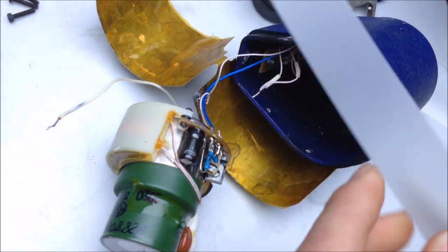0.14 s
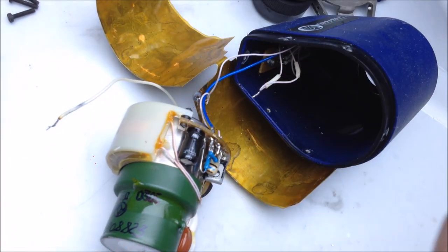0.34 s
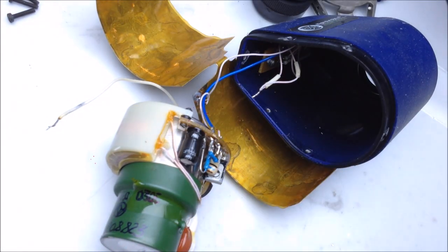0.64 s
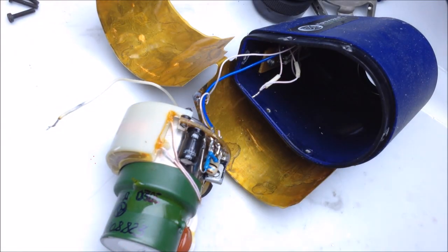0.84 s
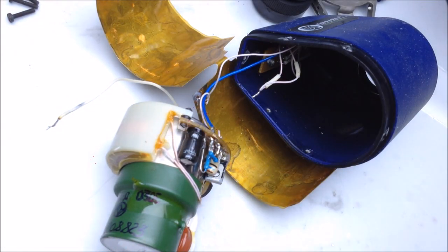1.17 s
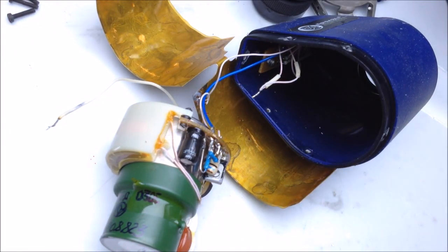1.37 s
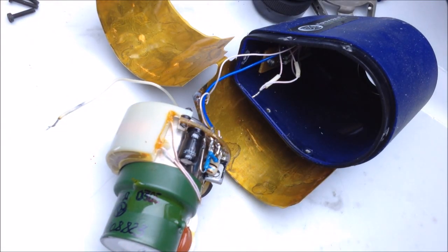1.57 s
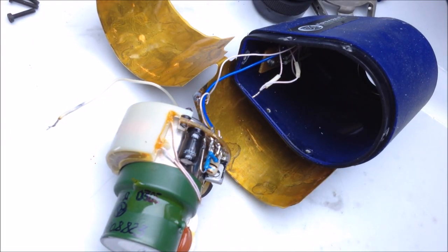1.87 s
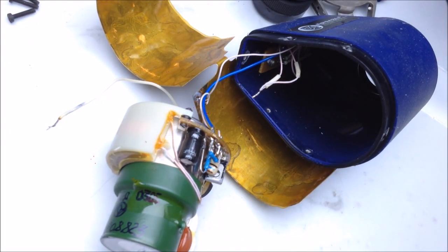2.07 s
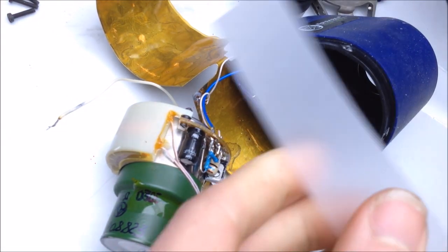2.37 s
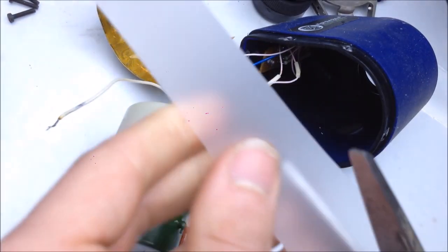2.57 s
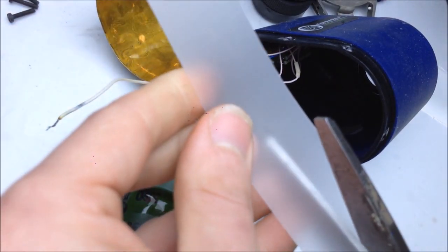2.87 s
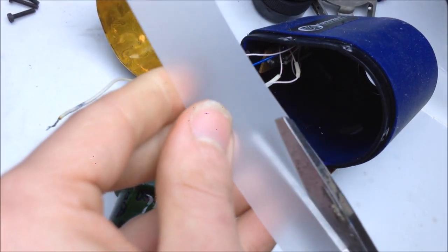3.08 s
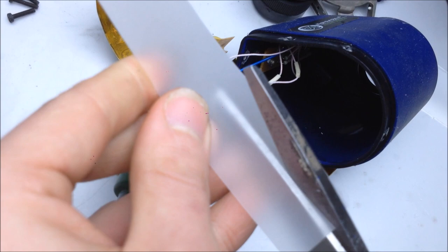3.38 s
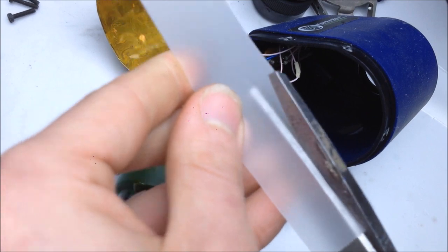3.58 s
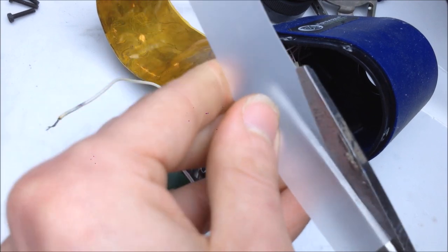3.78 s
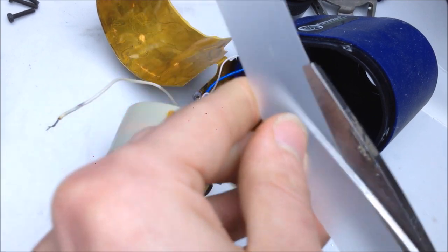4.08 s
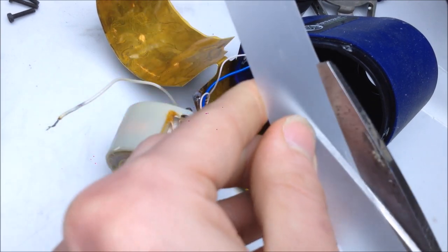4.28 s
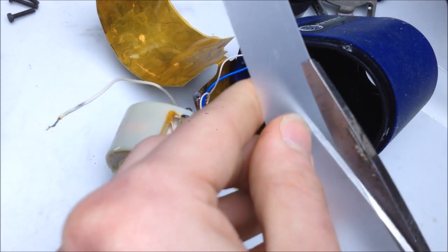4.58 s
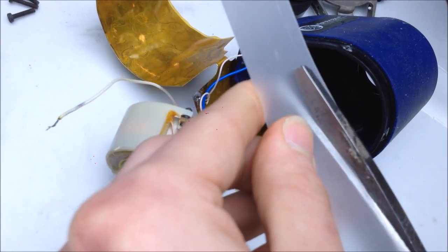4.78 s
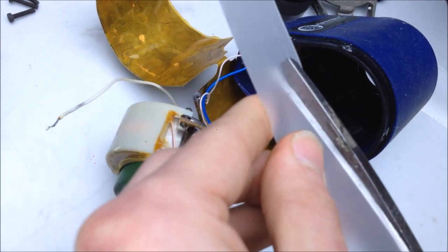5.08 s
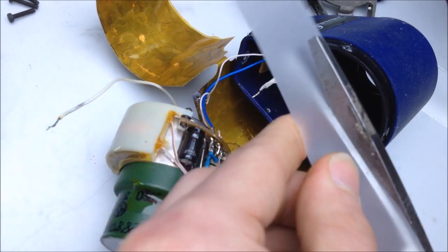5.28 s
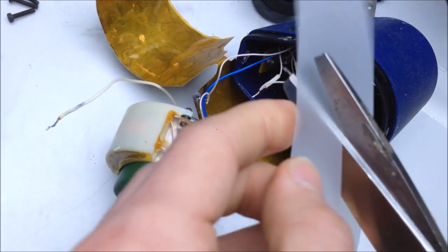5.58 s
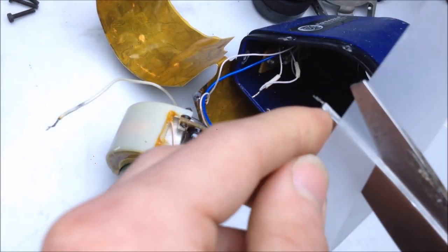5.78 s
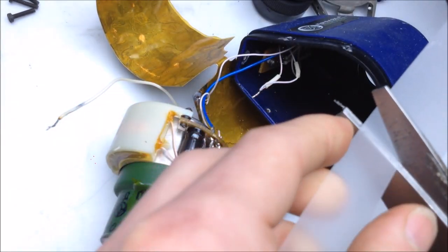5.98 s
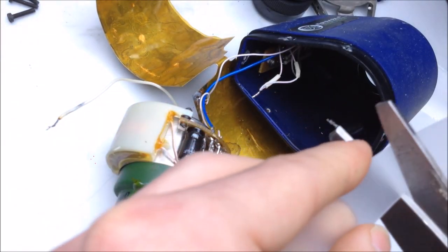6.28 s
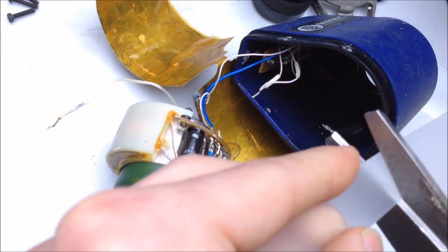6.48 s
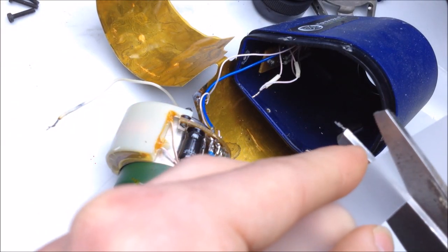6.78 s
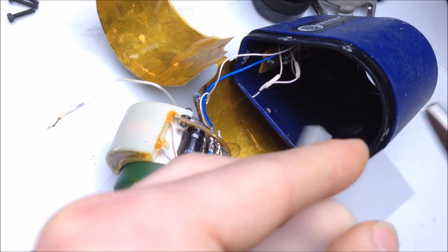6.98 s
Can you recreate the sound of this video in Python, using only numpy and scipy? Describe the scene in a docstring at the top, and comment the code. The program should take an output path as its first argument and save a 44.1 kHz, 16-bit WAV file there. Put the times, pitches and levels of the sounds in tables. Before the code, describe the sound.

Close scissors cut a plastic strip in crisp strokes and sticky, squeaky slips, ending with sharp snips above a soft steady hum.

```python
"""Scissors through thin plastic

Close up, over a workbench in a small room, scissors cut a strip off a plastic sheet. Each closing stroke
crunches through it; then the open blades are pushed up the slit in sticky, squeaky slips. The strip snaps
free and a last piece is snipped off. Fingers shift the sheet; a fan and a faint whine sit underneath."""
import sys
import numpy as np
from scipy import signal
from scipy.fft import rfft, irfft, next_fast_len
from scipy.io import wavfile
from scipy.ndimage import map_coordinates

SR = 44100
rng = np.random.default_rng(int(sys.argv[2]) if len(sys.argv) > 2 else 0)


def persist_wave(psi):
    """Save psi, clipped to +-1, as 16-bit WAV."""
    counts = np.round(np.clip(psi, -1, 1) * 32767).astype(np.int16)
    wavfile.write(sys.argv[1], SR, np.atleast_2d(counts).T)


N = 315030
STROKE_ATTACK_S = 0.0035

# Cue levels are relative: each layer adds its own trim.
# closing strokes: t/s, length/s, sheet body/dB, cutting edge/dB, growth over the stroke/dB, jolt/dB
STROKES = [(3.306, 0.064, -33.5, -30, -5, -34), (3.736, 0.036, -31.5, -31, -5.5, -45),
           (4.126, 0.093, -42.5, -35, -2, -58), (4.914, 0.056, -37.5, -36, 8, -60),
           (5.277, 0.068, -42, -36, 11, -53)]
# pushes up the slit: t/s, length/s, rub/dB, treble/dB, sheet f/Hz, squeak f/Hz, squeak window/s
PUSHES = [(2.884, 0.23, -51.5, 1.5, 860, 11800, 0.17), (3.445, 0.13, -50, -5.5, 770, 12500, 0.035),
          (3.899, 0.072, -49.5, 1.5, 880, 13000, 0.015), (4.623, 0.15, -44.5, 0.5, 994, 12300, 0.04),
          (5.021, 0.17, -49.5, -1, 750, 13200, 0.015)]
# the slit's edges slip along the blades: t/s, level/dB, length/s, bass/dB
SLIPS = [(2.8842, -42, 0.0038, -7), (2.9495, -56, 0.0017, 9), (2.9853, -35.5, .008, -3),
         (3.032, -32, 0.011, -1), (3.0655, -33, 0.0089, -0.5), (3.0983, -24, 0.0074, -3.5),
         (3.13, -30.5, 0.0067, -3.5), (3.4476, -47.5, 0.0019, -15), (3.477, -33.5, 0.0059, -4.5),
         (3.506, -25, 0.0052, -5), (3.535, -25, 0.011, -6.5), (3.5778, -28, 0.0046, -9.5),
         (3.905, -33, 0.0067, 3), (3.9277, -34, 0.0078, 0.5), (3.9474, -32, 0.0087, -4.5),
         (3.973, -37, 0.0043, -8), (3.9866, -35, 0.0091, -9), (4.6225, -50, 0.0052, 9),
         (4.6525, -36, .004, -9), (4.679, -30.5, 0.0077, -1.5), (4.7053, -36.5, 0.0092, 12),
         (4.722, -33, 0.0064, 0.5), (4.7447, -32.5, 0.0085, 1), (4.7669, -30.5, 0.0052, -4),
         (4.8385, -53.5, 0.0014, -10), (5.0313, -48.5, .001, -12), (5.0528, -28.5, 0.014, -3.5),
         (5.0796, -26, 0.0073, 7.5), (5.102, -32, 0.0074, 0), (5.1442, -27, 0.009, -5.5),
         (5.1744, -33.5, 0.0047, -13)]
# the blades break through or shut: t/s, level/dB, length/s, bass/dB, treble/dB, sheet f/Hz
SNAPS = [(4.3257, -17, 0.0033, -1, -1, 840), (4.3413, -31, 0.00074, 0.5, 3, 1320),
         (5.326, -25, 0.006, -8, 10.5, 710), (5.3795, -14.0, 0.0037, -1, -2.5, 1122)]
# resonances of sheet and blades: f/Hz, width/Hz, level/dB
BODY_MODES = [(735, 29, 5), (1086, 150, -10), (2153, 65, -29), (2400, 100, -11), (2720, 170, -5),
              (4260, 38, -9), (4490, 210, 2.5), (6390, 550, -5), (8790, 160, 4), (11800, 33, -15),
              (12330, 120, -16.5)]


def cutting(body_db=-3, edge_db=-3.5, ring_db=-6, crack_db=1, crack_bass_db=-11):
    """The closing blades crush the plastic finely; now and then a crack runs ahead."""
    cracks = [(3.3239, -28.5), (3.3436, -35), (3.3741, -31.5), (4.129, -25.5), (4.1591, -39), (4.1949, -29),
              (4.216, -32), (4.965, -40.5)]  # the loudest fractures: t/s, level/dB
    crunch_eq = [(47, -49), (80, -38.5), (227, -4), (386, -8.5), (1070, 3), (1560, -5), (2380, -3.5),
                 (3540, -11.5), (4420, -6), (5170, -12), (6310, -7.5), (11700, -19.5), (15000, -31),
                 (16000, -41)]  # colour of crushed plastic: f/Hz, level/dB
    crunch, body_gain, edge_gain = friction(rate=3000), np.zeros(N), np.zeros(N)
    for start, length, sheet_db, blade_db, growth_db, _ in STROKES:
        pressure = gesture(start, length, STROKE_ATTACK_S, fall_db_per_s=804, growth_db=growth_db)
        body_gain += amp(sheet_db) * pressure
        edge_gain += amp(blade_db) * pressure
    lows = lambda hz: 1 / (1 + (hz / 2000) ** 2)
    track = amp(body_db) * radiate(body_gain * crunch, crunch_eq, ring_db, lows)
    track -= amp(edge_db) * radiate(edge_gain * crunch, crunch_eq, ring_db, lambda hz: 1 - lows(hz))
    t = np.arange(SR // 20) / SR
    brighter = lambda hz: amp(along(crunch_eq, hz) + crack_bass_db * lows(hz))
    for start, db in cracks:
        tear = flutter(t, t60=0.003, tail_db=3)
        crack = signal.fftconvolve(tear, flutter(t, t60=0.012, tail_db=-3.5))[:len(t)]
        add(track, start, colour(crack, brighter), db + crack_db)
    return track


def snapping():
    """The last of the plastic gives way at once and the blades clack together."""
    snap_eq = [(47, -67.5), (80, -41.5), (232, -23), (538, -18), (839, 0), (1220, -15.5), (2130, -8.5),
               (3540, -10), (4420, -4.5), (5050, -10), (7360, -5.5), (13100, -22), (16000, -30)]  # colour of the clack: f/Hz, level/dB
    snap_modes = [(850, 39, -4.5), (2120, 81, -12.5), (2920, 84, -8.5), (4483, 290, 9.5), (5820, 150, 0),
                  (6160, 110, -9), (6460, 77, -6.5), (7200, 270, -10), (8320, 58, -11.5)]  # its resonances: f/Hz, width/Hz, level/dB
    return bursts(SNAPS, snap_eq, snap_modes, ring_db=-1.5, tick_db=-18, rate=6000,
                  tail_t60=0.044, tail_db=-5.5, gain_db=-0.5, drift=0.005)


def snipping():
    """The blades cut across the strip's end in short, bright bites."""
    snips = [(0.0012, -27.5, 0.0073, 10.5, 6.5, 960), (6.798, -23.5, 0.00097, -5, -8.5, 1000),
             (6.9245, -14, 0.0095, -2.5, -2, 1306), (6.9519, -14.5, 0.014, 7.5, 6, 1060)]  # bites: t/s, level/dB, length/s, bass/dB, treble/dB, sheet f/Hz
    snip_eq = [(47, -64), (80, -39.5), (441, -25), (1140, -10.5), (2270, -8), (2780, -6), (3700, -7),
               (4140, 1.5), (5400, -9.5), (6310, -2.5), (8600, -5), (9190, -12), (14600, -11), (16000, -26)]  # their colour: f/Hz, level/dB
    snip_modes = [(2980, 96, 6), (4240, 79, -12), (5900, 160, -2), (8300, 340, -7), (10100, 130, -14),
                  (11600, 190, 0), (12400, 110, -9)]  # their resonances: f/Hz, width/Hz, level/dB
    return bursts(snips, snip_eq, snip_modes, ring_db=-1, tick_db=-16, rate=4500,
                  tail_t60=0.034, tail_db=-6.5, gain_db=-1.5, drift=0.035)


def advancing(wedged_s=0.11, dulling_db=7, sheet_scatter=0.072):
    """The open blades stick and slip up the slit; the slips turn duller as the sheet grips them."""
    scrape_eq = [(47, -61), (80, -42), (163, -22), (515, -8.5), (702, -2), (802, -8.5), (980, -2),
                 (1530, -6.5), (2780, -5), (3540, -9.5), (4520, -5), (4940, -6), (14600, -14), (16000, -32)]  # colour of plastic on steel: f/Hz, level/dB
    rub = np.zeros(N)
    for start, length, rub_db, *_ in PUSHES:
        wedged = min(length, wedged_s)  # the blades rub only at the end of a push, once wedged in
        pressure = gesture(start + length - wedged, wedged, attack_s=0.019, fall_db_per_s=502, growth_db=3)
        rub += amp(rub_db) * pressure
    slips = []
    for (at, db, length, bass_db), bend in zip(SLIPS, rng.standard_normal(len(SLIPS))):
        start, push_length, _, treble_db, sheet_hz, *_ = push_at(at)
        depth = np.clip((at - start) / push_length, 0, 1) - 0.5
        bent_hz = sheet_hz * np.exp(sheet_scatter * bend)
        slips.append((at, db, length, bass_db, treble_db - dulling_db * depth, bent_hz))
    ticks = bursts(slips, scrape_eq, BODY_MODES, ring_db=-5, tick_db=-13.5, rate=3200,
                   tail_t60=0.035, tail_db=-3.5, gain_db=0, drift=0.016)
    return ticks + radiate(rub * friction(rate=4200), scrape_eq, ring_db=-3.5)


def squeaks(t60=0.07, width_hz=600, gain_db=-10):
    """Steel rubbing on steel gives the first slips of each push a very high, rough ring."""
    track, t = np.zeros(N), np.arange(SR // 8) / SR
    for at, db, *_ in SLIPS:
        start, *_, squeak_hz, window = push_at(at)
        if at < start + window:
            rub = rng.standard_normal(len(t)) * amp(-60 * t / t60)
            squeak = colour(rub, lambda hz: resonances([(squeak_hz, width_hz, 0)], hz))
            add(track, at, squeak, db + gain_db)
    return track


def jolts(thump_hz=200, t60=0.07, attack_s=0.0036, stroke_db=-8, snap_db=-32):
    """A soft, low knock in the hands as the blades bite and as they break through."""
    track, t = np.zeros(N), np.arange(SR // 5) / SR
    bites = [(start + STROKE_ATTACK_S, db + stroke_db) for start, *_, db in STROKES]
    breaks = [(start, db + snap_db) for start, db, *_ in SNAPS]
    for start, db in bites + breaks:
        hz = thump_hz * np.exp(0.07 * rng.standard_normal())
        knock = np.sin(2 * np.pi * hz * t) * amp(-60 * t / t60)
        add(track, start, knock * (1 - np.exp(-t / attack_s)), db)
    return track


def zings(jitter=0.55):
    """Three brief, rough, pitched zings swell and die."""
    envelopes = [(4.34, -36, .003, .044), (4.426, -37, .018, .02), (6.977, -21.5, .012, .027)]  # one a zing: crest t/s, level/dB, rise/s, fall/s
    partial_sets = [
        [(2500, 260, 1), (5600, 62, -1), (6100, 29.8, 0), (6590, 24, -1), (7100, 31, 12), (950, 160, -1),
         (10860, 28, -0.5)],
        [(966, 320, -0.5), (1465, 258, 0.5), (2360, 125, -4), (2960, 110, -3), (6500, 230, 0), (8350, 140, -12)],
        [(897, 190, -7.5), (2445, 307, -8.5), (4140, 88, -6.5), (4670, 72, -8.5), (6180, 110, -7),
         (7340, 81, -8), (8360, 370, -2), (9320, 120, -4)],
    ]  # one set a zing: f/Hz, width/Hz, level/dB
    t, track = np.arange(N) / SR, np.zeros(N)
    for (crest, level_db, rise, fall), partials in zip(envelopes, partial_sets):
        attack = np.clip(1 + (t - crest) / rise, 0, 1)
        release = np.clip(1 - (t - crest) / fall, 0, 1) ** 2
        zing = np.zeros(N)
        for hz, width, db in partials:
            unsteady_hz = hz + jitter * width * wobble(400)
            zing += amp(db) * np.sin(2 * np.pi * np.cumsum(unsteady_hz) / SR)
        track += amp(level_db) * attack * release * unit(zing)
    return track


def brushing(level_db=-50.5):
    """The sheet brushes the bench once."""
    brush_eq = [(240, -40), (400, -27), (900, -2.5), (1390, -9), (1590, -1), (2220, -15), (2580, -6.5),
                (10300, -14.5), (15000, -19)]  # colour of plastic on the bench: f/Hz, level/dB
    sweep = gesture(start=0.4565, length=0.036, attack_s=0.009, fall_db_per_s=184)
    return amp(level_db) * radiate(sweep * friction(rate=1700), brush_eq, ring_db=-1)


def sliding(hiss_db=-70, hiss_knee_db=-62):
    """The sheet rustles under the fingers; even the lightest slide hisses."""
    slides = [(0.202, 0.053, -66.5), (1.56, 0.021, -65), (1.624, 0.21, -67.5), (1.923, 0.037, -60),
              (2.028, 0.034, -63), (2.51, 0.11, -64), (2.614, 0.043, -54), (2.658, 0.035, -51),
              (2.708, 0.068, -53.5), (4.525, 0.065, -53.5), (4.599, 0.027, -55), (5.495, 0.056, -58),
              (5.577, 0.047, -47.5), (5.656, 0.041, -45), (5.748, 0.081, -57), (5.874, 0.045, -51),
              (5.98, 0.063, -53.5), (6.2, 0.046, -51.5), (6.264, 0.086, -51.5), (6.394, 0.034, -56),
              (7.133, 0.028, -55)]  # finger moves: middle t/s, length/s, level/dB
    rustle_eq = [(200, -39), (500, -8), (800, 1.5), (1500, 0), (2700, 1), (4500, -1), (8000, -1),
                 (12000, -8.5), (16000, -17)]  # colour of the rustle: f/Hz, level/dB
    hiss_eq = [(2000, -27), (7000, -10), (13000, -3), (16000, -3)]  # f/Hz, level/dB
    motion = sum(amp(db) * hump(middle, length, edge_db=10.5) for middle, length, db in slides)
    rustle = radiate(motion * friction(rate=5100), rustle_eq, ring_db=-3)
    contact = np.tanh(motion / amp(hiss_knee_db))  # the hiss levels off on firmer slides
    return rustle + amp(hiss_db) * radiate(contact * friction(rate=4600), hiss_eq, ring_db=-12)


def tapping():
    """Sheet and scissors knock lightly in the hands."""
    taps = [(0.231, -57.5, 0.0017, -16, 700), (1.2886, -54, 0.0034, 7, 730),
            (2.5587, -44.5, 0.0019, 2, 700), (4.424, -32.5, .014, -4, 865), (4.452, -47.5, 0.0028, 2, 1180),
            (5.4836, -49, 0.0061, -1, 716), (5.515, -53, 0.0043, 3, 790), (5.7525, -37.5, 0.0071, 0, 1174),
            (6.208, -47, 0.0036, -2.5, 1010), (7.0442, -31, 0.0075, 8, 1340),
            (7.0668, -36, 0.00091, -3.5, 1260), (7.0807, -35, .012, 2.5, 1370)]  # knocks: t/s, level/dB, length/s, brightness/dB, sheet f/Hz
    tap_eq = [(180, -45), (300, -10), (565, -12.5), (842, 0), (2070, -6.5), (2280, -5.5), (5250, -9.5),
              (6410, -5.5), (14500, -18), (16000, -40.5)]  # their colour: f/Hz, level/dB
    events = [(at, db, length, -bright_db, bright_db, hz) for at, db, length, bright_db, hz in taps]
    return bursts(events, tap_eq, BODY_MODES, ring_db=-5, tick_db=-9.5, rate=2000,
                  tail_t60=0.042, tail_db=-1, gain_db=-2, drift=0.04)


def room(x, build_s=0.0023):
    """Short reflections off bench and walls; a fresh tail every 0.2 s stands for the moving hands."""
    decay_times = [(200, 0.15), (600, .15), (1500, 0.11), (4000, 0.087), (12000, 0.12)]  # room decay: f/Hz, t60/s
    wet, hop = np.zeros(N + SR), SR // 5
    for start in range(0, N, hop):
        hz, t, noise = signal.stft(rng.standard_normal(SR // 4), SR, nperseg=128)
        decay = amp(-60 * t / along(decay_times, hz)[:, None])
        tail = signal.istft(noise * decay, SR, nperseg=128)[1]
        tail *= 1 - np.exp(-np.arange(len(tail)) / SR / build_s)
        answer = signal.fftconvolve(x[start:start + hop], tail / np.linalg.norm(tail))
        wet[start:start + len(answer)] += answer
    return wet[:N]


def fan(air_db=-64, swell_db=-66.5, swell_hz=251, swell_width_hz=110):
    """A soft, wavering bed of fan noise and hiss that swells once in the bass."""
    air_eq = [(25, -40.5), (60, -15), (100, -9.5), (160, 3.5), (260, 3), (330, -2), (450, -7.5),
              (1100, -8.5), (2000, -10.5), (3500, -13.5), (6000, -19), (15000, -23), (16000, -25)]  # colour of the moving air: f/Hz, level/dB
    air = unit(colour(rng.standard_normal(N), lambda hz: amp(along(air_eq, hz))))
    air *= amp(air_db + 0.77 * wobble(3))
    bass_band = lambda hz: resonances([(swell_hz, swell_width_hz, 0)], hz) ** 2
    bass = unit(colour(rng.standard_normal(N), bass_band))
    return air + amp(swell_db) * hump(middle=1.38, length=0.48, edge_db=6) * bass


def whine():
    """Equipment hums and whines thinly, its tones drifting very slightly together."""
    tones = [(183.0, -84), (242.2, -86.5), (382.2, -76), (1152, -83.5), (1470, -67), (3182, -86.5),
             (3553, -81.5), (4226, -89.5)]  # steady tones: f/Hz, rms level/dB
    clock = np.cumsum(1 + 0.0002 * wobble(3)) / SR
    return np.sqrt(2) * sum(amp(db) * np.sin(2 * np.pi * hz * clock) for hz, db in tones)


def bursts(events, eq, modes, ring_db, tick_db, rate, tail_t60, tail_db, gain_db, drift):
    """Each event is a first tick and a short run of micro-slips, ringing in sheet and blades."""
    track, t = np.zeros(N), np.arange(SR // 8) / SR
    for start, db, length, bass_db, treble_db, sheet_hz in events:
        envelope = np.minimum(4 * t / length, 1) / (1 + (t / length) ** 6)
        run = grains(len(t), rate, spread_db=4.5) * envelope
        force = run / (np.linalg.norm(run) + 1e-9) + amp(tick_db) * (t == 0)
        waves = signal.fftconvolve(force, flutter(t, tail_t60, tail_db))[:len(t)]
        detune = np.exp(drift * rng.standard_normal())  # the resonances move with the contact point
        sheet_mode = [(sheet_hz, 220, 1)]  # f/Hz, width/Hz, level/dB
        shelves = lambda hz: bass_db / (1 + (hz / 1500) ** 4) + treble_db / (1 + (8000 / (hz + 1)) ** 6)
        ring = lambda hz: amp(ring_db) * resonances(modes, hz * detune) + resonances(sheet_mode, hz)
        burst = colour(waves, lambda hz: amp(along(eq, hz) + shelves(hz)) * (1 + ring(hz)))
        add(track, start, burst, db + gain_db)
    return track


def friction(rate):
    """An unbroken stream of grains, rms 1; their echoes in the sheet change as it bends."""
    ticks, sheet = grains(N, rate, spread_db=5), np.zeros(N + SR)
    t, hop = np.arange(SR // 30) / SR, SR // 25
    for start in range(0, N, hop):
        piece = signal.fftconvolve(ticks[start:start + hop], flutter(t, t60=0.013, tail_db=-4.5))
        sheet[start:start + len(piece)] += piece
    return unit(sheet[:N])


def grains(count, rate, spread_db):
    """Random tiny impulses of log-normal size, rate a second."""
    chance, size = rng.random(count), rng.standard_normal(count)
    return (chance < rate / SR) * rng.choice([-1, 1], count) * amp(spread_db * np.clip(size, -2, 2))


def flutter(t, t60, tail_db):
    """An impulse and the dense, quickly dying waves that it sends through the sheet."""
    tail = rng.standard_normal(len(t)) * amp(-60 * t / t60)
    return (t == 0) + amp(tail_db) * tail / np.linalg.norm(tail)


def radiate(force, eq, ring_db, band=lambda hz: 1):
    """Sheet and blades colour a force and keep its level."""
    body = lambda hz: 1 + amp(ring_db) * resonances(BODY_MODES, hz)
    return colour(force, lambda hz: unit(band(hz) * amp(along(eq, hz)) * body(hz)))


def resonances(modes, hz, narrowest_hz=100):
    """Summed gain of (f/Hz, width/Hz, level/dB) peaks; damping by the fingers sets a minimum width."""
    return sum(amp(db) / (1 + (2 * (hz - centre) / max(width, narrowest_hz)) ** 2)
               for centre, width, db in modes)


def colour(x, gain):
    """Minimum-phase EQ with the given gain over frequency."""
    size = 2 * next_fast_len(len(x))
    response = np.maximum(gain(np.fft.rfftfreq(size, 1 / SR)), 1e-6)
    cepstrum = irfft(np.log(response))
    cepstrum[1:size // 2] *= 2
    cepstrum[size // 2 + 1:] = 0
    return irfft(rfft(x, size) * np.exp(rfft(cepstrum)))[:len(x)]


def gesture(start, length, attack_s, fall_db_per_s, growth_db=0):
    """Envelope: attack, a hold that ramps steadily in dB, release."""
    t = np.arange(N) / SR - start
    held = np.clip(t / length, 0, 1) - 0.5
    return np.clip(t / attack_s, 0, 1) * amp(growth_db * held - fall_db_per_s * np.maximum(t - length, 0))


def hump(middle, length, edge_db):
    """Envelope: a smooth swell and fade, edge_db down at both ends."""
    away = 2 * (np.arange(N) / SR - middle) / length
    return amp(-np.minimum(edge_db * away ** 2, 200))


def push_at(at):
    """The push whose middle is nearest to a moment."""
    return min(PUSHES, key=lambda push: abs(at - push[0] - push[1] / 2))


def add(track, start, sound, db):
    """Mix in a sound whose energy equals 10 ms at the given level."""
    part = track[max(round(start * SR), 0):][:len(sound)]
    part += (amp(db) * np.sqrt(SR / 100) * sound / np.linalg.norm(sound))[:len(part)]


def wobble(rate):
    """A smooth random curve, rate knots a second."""
    return map_coordinates(rng.standard_normal(int(N * rate / SR) + 4), [np.arange(N) * rate / SR])


def along(points, hz):
    """Read (f/Hz, value) points on a log frequency axis."""
    freqs, values = np.transpose(points)
    return np.interp(np.log(hz + 1), np.log(freqs + 1), values)


def amp(db):
    """Decibels to gain."""
    return 10 ** (np.asarray(db) / 20)


def unit(x):
    """Scale to rms 1."""
    return x / np.sqrt(np.mean(x ** 2) + 1e-20)


def scene(room_db=-13):
    """Scissors, zings and handling with a touch of room, over fan and whine, in mono."""
    scissors = cutting() + advancing() + squeaks() + snapping() + snipping() + jolts()
    foreground = scissors + zings() + brushing() + sliding() + tapping()
    return (foreground + amp(room_db) * room(foreground) + fan() + whine())[None]


def record(dry, top_hz=15900, taper_hz=700):
    """The microphone keeps nothing above its band limit."""
    size = next_fast_len(N + SR // 2)
    passed = np.clip((top_hz - np.fft.rfftfreq(size, 1 / SR)) / taper_hz, 0, 1)
    return irfft(rfft(dry, size) * np.sin(np.pi / 2 * passed) ** 2, size)[:, :N]


dry = scene()
out = record(dry)
persist_wave(out)
```